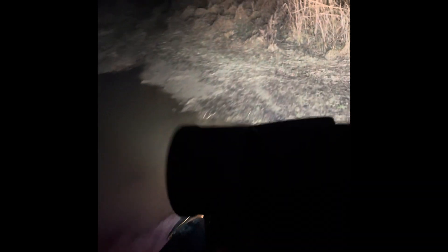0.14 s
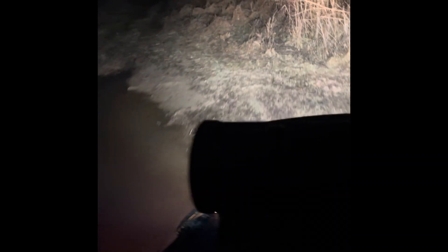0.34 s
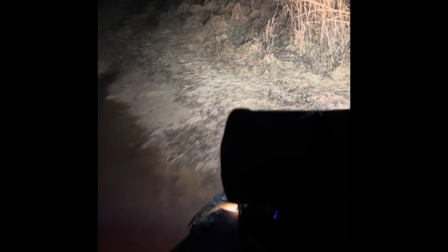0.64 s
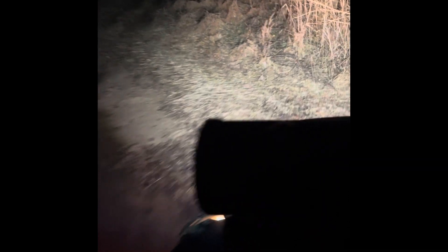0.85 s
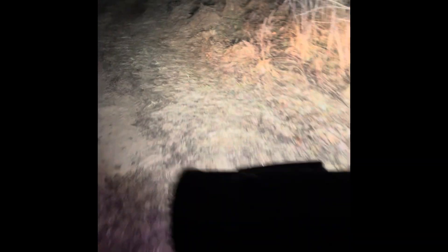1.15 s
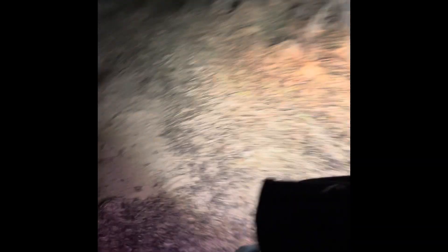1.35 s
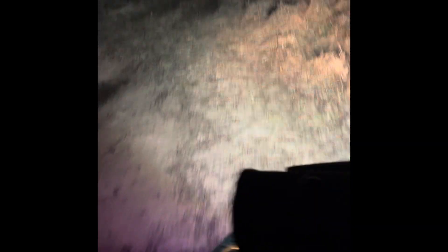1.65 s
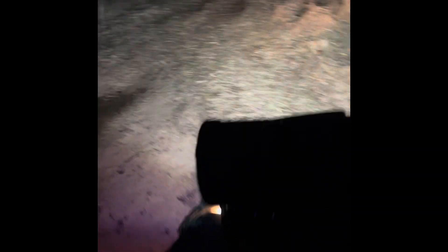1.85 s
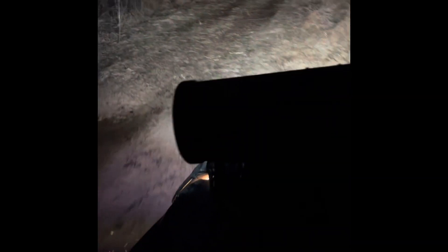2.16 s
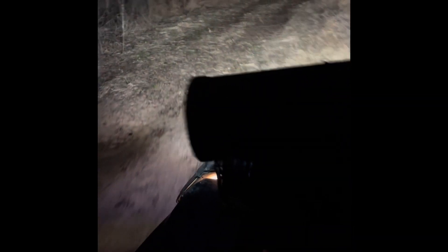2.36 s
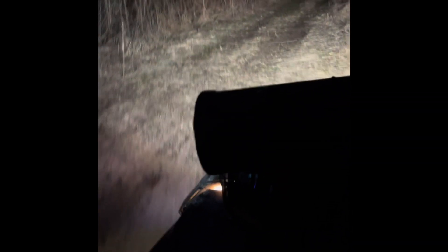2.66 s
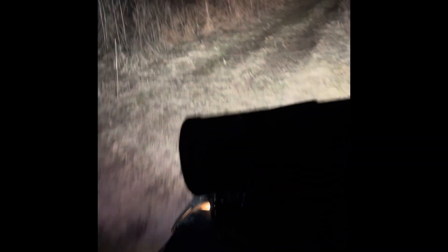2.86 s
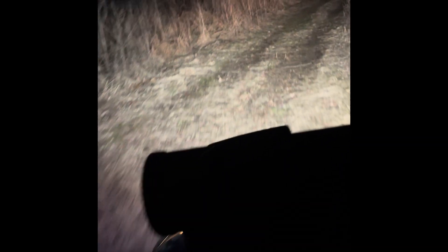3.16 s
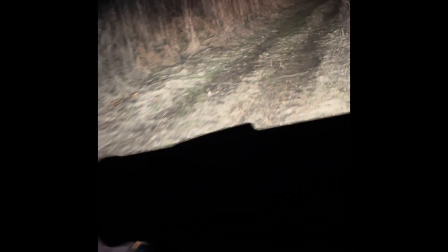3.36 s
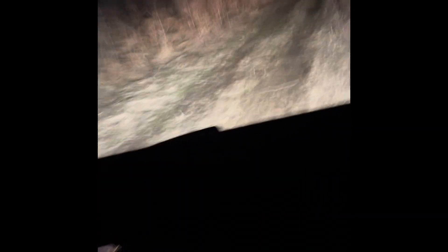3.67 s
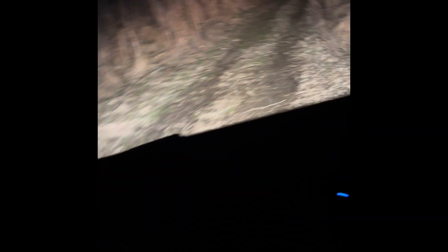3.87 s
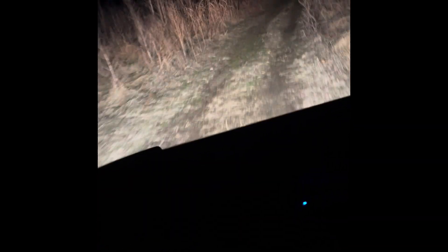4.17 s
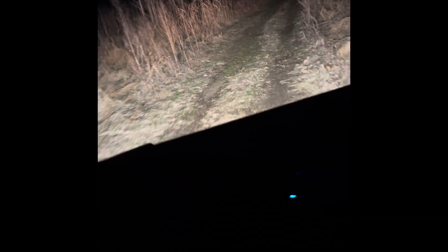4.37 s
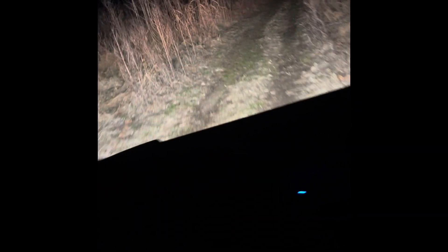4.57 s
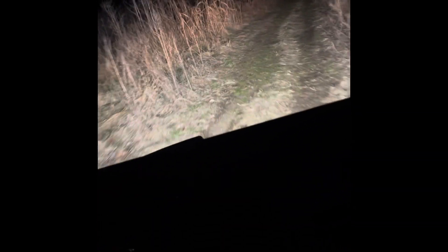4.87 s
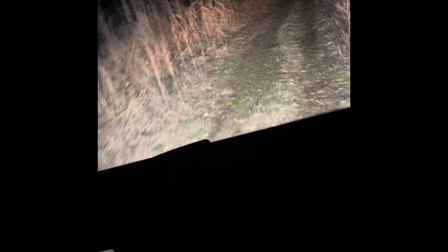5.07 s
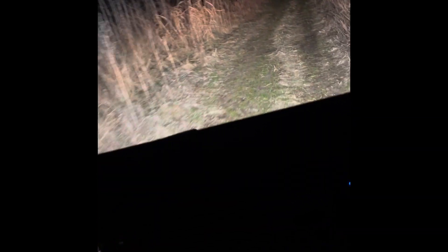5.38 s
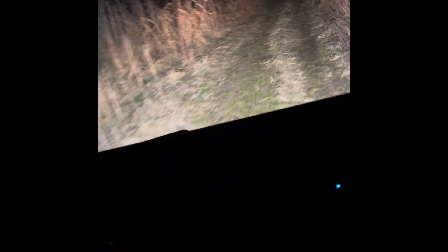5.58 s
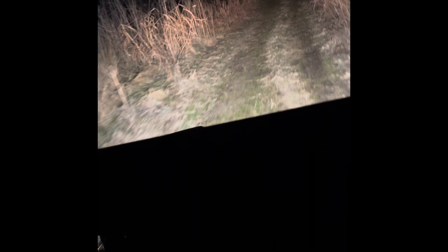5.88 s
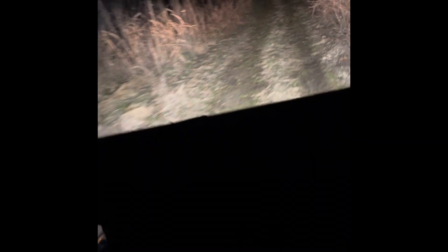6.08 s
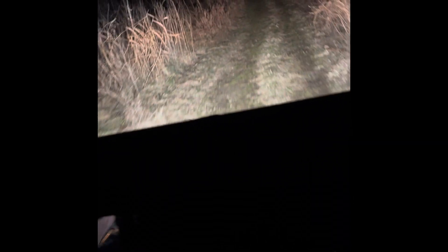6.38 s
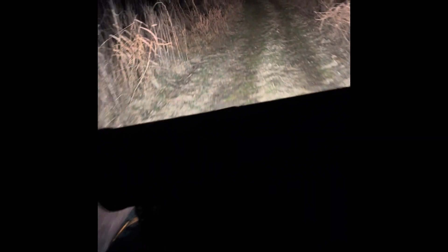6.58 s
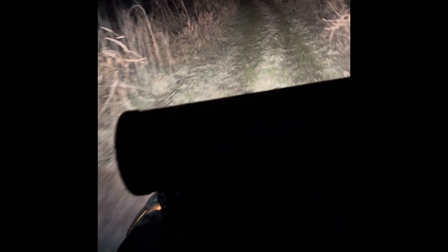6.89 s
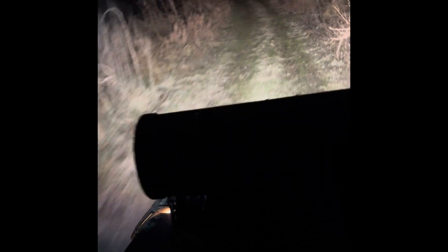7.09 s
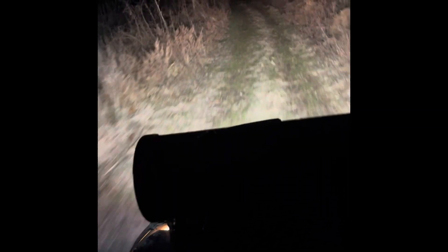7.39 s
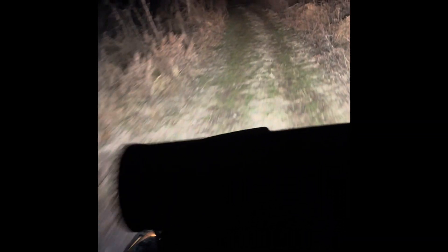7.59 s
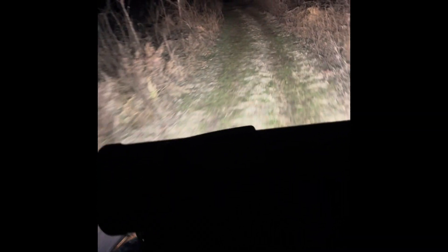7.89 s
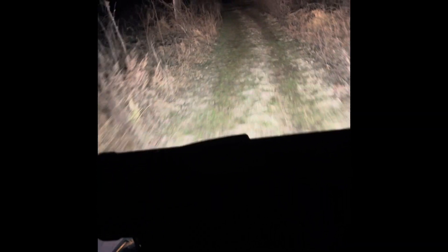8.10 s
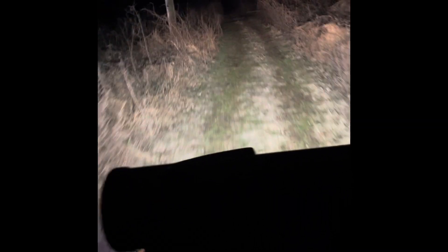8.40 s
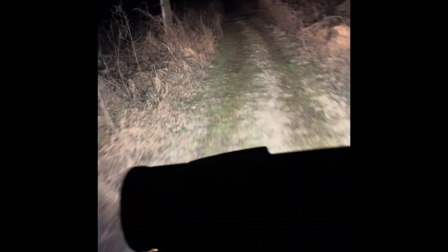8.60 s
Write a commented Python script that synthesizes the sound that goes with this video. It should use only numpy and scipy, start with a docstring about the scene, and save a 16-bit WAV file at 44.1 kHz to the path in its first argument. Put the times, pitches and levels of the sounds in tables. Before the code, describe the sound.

Low throbbing quad bike engine sags, surges and climbs to a steady drone, with a creaking frog at the start and bright spatter mid-way.

```python
"""On a muddy track at night, a two-cylinder quad bike grinds along, heard from the saddle.
Exhaust pulses ring in the pipe, and crankcase knocks, panels and teeth add higher tones tied to the engine.
Filtered noise makes gas and spray hiss in step with the firings; gliding tones are gears that whine now and then.
Short bursts of noise are the taps of a loose part, short pings are spray droplets on the bodywork,
and a frog, built from clicks of a ringing throat, creaks beside the track at the start."""
import sys
import numpy as np
from scipy import signal
from scipy.fft import rfft, irfft
from scipy.io import wavfile
from scipy.ndimage import uniform_filter1d

SR = 44100
rng = np.random.default_rng(int(sys.argv[2]) if len(sys.argv) > 2 else 0)


def store_wav(level_fs):
    """Save 16-bit WAV to argv[1]."""
    pcm = np.round(np.clip(np.atleast_2d(level_fs), -1, 1) * 32767)
    wavfile.write(sys.argv[1], SR, pcm.T.astype(np.int16))


N = 385434

# An engine "order" is a tone at a whole number of times the engine-cycle rate.
# Speeds at which the engine's tone is described. Each entry: engine cycles per second.
ENGINE_SPEEDS = [24.5, 28.5, 32, 36]
# Uneven firing of the two cylinders. Each row: order, then its level in dB at each of the four speeds.
FIRING_ORDERS = [(1, -37, -17, -24, -13), (2, 11.5, 12.5, 10, 7.5), (3, -8, -8, -5, -5.5),
                 (4, -4, 3.5, 3, 5), (5, 9, 10, 10, 2), (6, -4, 7, 1.5, -1.5), (7, -3, -6.5, -13, -9),
                 (8, -4.5, -4.5, 7, 5.5), (9, -6.5, -0.5, 5.5, 6), (10, -3, 10.5, -20, 5.5),
                 (11, 11, 8.5, 4, 7.5), (12, 8.5, -2.5, 5, 5.5), (13, 3, 0, -7.5, 9), (14, 2, -21, 5, -13),
                 (15, 4, -0.5, -25, -4), (16, -39, 7, 3.5, 6)]


def from_db(db):
    """Turn decibels into a gain."""
    return 10 ** (np.asarray(db) / 20)


def in_time(rows):
    """Join the points of a time table by straight lines: one value a sample for each column."""
    seconds, *columns = np.transpose(rows)
    return [np.interp(np.arange(N) / SR, seconds, column) for column in columns]


def at_hz(points, hz):
    """Read a spectrum table at any pitch, with pitch on a log scale."""
    table_hz, values = np.array(points).T
    return np.interp(np.log(np.maximum(hz, 1)), np.log(table_hz), values)


def coloured(x, points):
    """Filter to the given dB at each pitch, answering as early as possible (minimum phase)."""
    size = 2 ** 14
    gain = from_db(at_hz(points, np.arange(size // 2 + 1) * SR / size))
    # folding the cepstrum forward in time gives the minimum-phase filter
    cepstrum = irfft(np.log(gain))
    cepstrum[1:size // 2] *= 2
    cepstrum[size // 2 + 1:] = 0
    ringing = irfft(np.exp(rfft(cepstrum)))
    return signal.fftconvolve(x, ringing)[:N]


def drift(rate):
    """Wander slowly by chance around 0: "rate" random points a second, joined smoothly."""
    points = rng.standard_normal(int(N / SR * 200) + 4)
    # worked out at every 32nd sample, then filled in
    at = np.arange(N // 32 + 2) * 32 / SR * rate
    left = at.astype(int)
    blend = .5 - .5 * np.cos(np.pi * (at % 1))
    slow = points[left] * (1 - blend) + points[left + 1] * blend
    return np.interp(np.arange(N) / 32, np.arange(len(slow)), slow)


def struck(events, seconds, pulse):
    """Lay short pulses at their times; each row starts with time and dB, pulse(t, row) gives the shape."""
    out, t = np.zeros(N), np.arange(int(seconds * SR)) / SR
    for row in events:
        at = round(row[0] * SR)
        out[at:at + len(t)] += from_db(row[1]) * pulse(t, row)
    return out


def exhaust(per_s, cycle, throttle_db, labour_db, uneven_db):
    """One pulse pattern a cycle, built from orders, uneven from burn to burn and rung through the pipe."""
    # Exhaust pipe and body. Each row: pitch in Hz, height in dB of an engine order at that pitch.
    pipe = [(25, -32.5), (50, -28.5), (70, -15.5), (90, -11.5), (120, -15.5), (160, -31.5), (195, -11.5),
            (225, 1), (260, -21), (290, -28), (340, -22), (410, -32), (560, -38.5), (900, -61.5)]
    # Lag of the high orders at each of the four speeds, in radians per order squared.
    smear_table = [-0.0137, 0.0506, 0.0635, 0.0591]
    # The pulse turns from suck to push with speed. Each entry: half turns at one of the four speeds.
    skew_table = [0.43, -0.72, -1.436, -1.73]
    # Orders that swell when the engine labours. Each entry: order.
    thump_orders = (1, 3)
    # One weak burn: time in seconds, length in seconds, level change in dB.
    weak_burn = (1.035, .015, -6)
    turn = 2 * np.pi * (cycle + .002 * drift(30))
    # the orders leave the pipe at slightly different moments
    smear = np.interp(per_s, ENGINE_SPEEDS, smear_table)
    skew = np.pi * np.interp(per_s, ENGINE_SPEEDS, skew_table)
    pulses = np.zeros(N)
    for k, *dbs in FIRING_ORDERS:
        level_db = np.interp(per_s, ENGINE_SPEEDS, dbs) + labour_db * (k in thump_orders)
        pulses += from_db(level_db) * np.cos(k * turn - smear * k * k + skew)
    weak_at, weak_s, weak_change_db = weak_burn
    weak_db = weak_change_db * np.exp(-((np.arange(N) / SR - weak_at) / weak_s) ** 2)
    pulses *= from_db(throttle_db + weak_db + uneven_db * drift(45))
    return -coloured(pulses, pipe)


def crankcase(per_s, cycle, roar_db, swell_db):
    """Knocks repeat every cycle: high orders in scattered phase swell and fade, with panels and teeth."""
    # Crankcase ringing at the high orders. Each row: pitch in Hz, level in dB over the roar level.
    case = [(500, -19.5), (620, -17), (760, -14), (950, -21), (1150, -27), (1280, -22.5), (1480, -23.5),
            (1670, -24), (1850, -34), (2000, -23), (2150, -44.5), (2280, -32), (2550, -28.5), (2800, -34.5)]
    # Panels that sing when an engine order meets them. Each row: pitch in Hz, width in Hz,
    # level in dB over the roar level at the highest of the four speeds.
    panels = [(560, 40, -17), (735, 40, -11), (815, 70, -10), (2280, 60, -24)]
    # Orders that stand out at every speed, likely meshing teeth. Each row: order, dB over the roar level.
    mesh = [(16, -20), (23, -17), (36, -22)]
    top_order = 82   # the orders stop just below this
    panel_db_per_cycle = 1.7   # the panels sing more as the speed rises
    swelling, steady = np.zeros(N), np.zeros(N)
    turn = 2 * np.pi * (cycle + .002 * drift(12))
    for k in range(len(FIRING_ORDERS) + 1, top_order):
        order = np.cos(k * turn + rng.uniform(0, 2 * np.pi))
        steady += order
        # even orders lead, as both cylinders add up
        swelling += from_db(-3.0 * (k % 2) + swell_db * drift(4.0)) * order
    out = coloured(swelling * from_db(roar_db), case)
    for hz, width_hz, level_db in panels:
        edges_hz = [hz - width_hz / 2, hz + width_hz / 2]
        band = signal.butter(2, edges_hz, "band", fs=SR, output="sos")
        speed_db = panel_db_per_cycle * (per_s - max(ENGINE_SPEEDS))
        panel_db = roar_db + level_db + speed_db + 2.0 * drift(15)
        out += from_db(panel_db) * signal.sosfilt(band, steady)
    for k, level_db in mesh:
        out += from_db(roar_db + level_db + 3.1 * drift(7.1)) * np.cos(k * turn)
    return out


def roar(cycle, roar_db, hiss_db, flicker_db):
    """Gas and spray noise swings with each puff; noise shared by the ears mixes with noise opposite in them."""
    # Noise common to both ears. Each row: pitch in Hz, relative level in dB per Hz.
    mid_colour = [(25, -6.5), (120, 1), (230, -6.5), (330, -0.5), (430, -6.5), (541, -8), (780, -5.5),
                  (1180, -17), (1960, -17), (3300, -25), (4800, -32), (5700, -23), (8110, -30), (9100, -92),
                  (9700, -33), (11200, -25), (13300, -36.5)]
    # Noise opposite in the two ears. Each row: pitch in Hz, relative level in dB per Hz.
    side_colour = [(100, -32), (400, -15.5), (750, -13), (1200, -28.5), (1750, -46), (2500, -23.5),
                   (4000, -27.5), (5000, -25.5), (6100, -40.5), (7200, -27), (9000, -24), (11000, -25),
                   (12000, -46), (13300, -71)]
    # Share of the opposite noise that is the common noise reaching one ear first.
    # Each row: pitch in Hz, share (over 0 means left first).
    one_sided = [(700, -.5), (3300, -.5), (4000, .6), (8800, .85), (9600, -.8)]
    # Gas puffs within an engine cycle. Each row: place in the cycle from 0 to 1, sharpness,
    # lift of the roar in dB, lift of the hiss in dB.
    puffs = [(0.401, 13, -1.5, 3.5), (.72, 0.63, 2, -1)]
    split_hz = 2720   # roar below, hiss above
    rasp_db, hiss_flicker_db = 1.0, 1.03   # burn-to-burn unevenness of the roar; flicker of the treble
    hz = np.arange(N // 2 + 1) * SR / N
    share = at_hz(one_sided, hz)
    common, own = rfft(rng.standard_normal((2, 2, N)))
    # the quarter-turn 1j makes the shared part arrive earlier in one ear
    opposite = 1j * share * common + np.sqrt(1 - share ** 2) * own
    mid_spectrum = common * from_db(at_hz(mid_colour, hz))
    side_spectrum = opposite * from_db(at_hz(side_colour, hz))
    # two separate noises, each holding a mid (common) and a side (opposite) signal
    dull, bright = irfft(np.stack([mid_spectrum, side_spectrum], axis=1), N)
    low = signal.sosfilt(signal.butter(2, split_hz, "low", fs=SR, output="sos"), dull)
    high = signal.sosfilt(signal.butter(2, split_hz, "high", fs=SR, output="sos"), bright)
    low_db = roar_db + flicker_db * drift(12) + rasp_db * drift(70)
    high_db = hiss_db + hiss_flicker_db * drift(60)
    for place, sharpness, roar_lift_db, hiss_lift_db in puffs:
        puff = np.exp(sharpness * (np.cos(2 * np.pi * (cycle - place)) - 1))
        low_db = low_db + roar_lift_db * puff
        high_db = high_db + hiss_lift_db * puff
    mid, side = low / low[0].std() * from_db(low_db) + high / high[0].std() * from_db(high_db)
    return np.array([mid + side, mid - side])


def gears(cycle, wander_db):
    """Meshing teeth sing as wavering tones that glide, throb once a cycle and fade in and out."""
    # Gear whines. Each row: start in seconds, end in seconds, first pitch in Hz, last pitch in Hz,
    # level in dB (averaged over the wave, before throb and wander).
    whines = [(.82, 1.198, 1350, 1320, -44), (3, 3.943, 2140, 2300, -52), (3.084, 3.692, 1090, 1091, -36),
              (3.003, 4.892, 1675, 1708, -44), (3.806, 4.7, 1385, 1370, -57), (3.803, 5, 1056, 1058, -42.5),
              (3.901, 6.1, 890, 905, -52.5), (4, 6.2, 985, 987, -48.5), (5, 6.318, 1242, 1315, -39),
              (5.298, 6.22, 1896, 1896, -44.5), (6.18, 6.554, 1900, 2000, -50),
              (6.252, 6.655, 1303, 1510, -38), (6.258, 6.517, 1012, 1190, -39),
              (6.456, 8, 2020, 1945, -41.5), (6.501, 7.25, 958, 943, -37.5), (6.656, 7.6, 1644, 1625, -43),
              (6.907, 7.8, 2270, 2350, -48), (7.45, 8.902, 800, 826, -38.5), (7.852, 8.5, 1075, 1085, -41)]
    fade_s, throb_depth = 0.085, 0.49   # depth from 0 to 1
    out, t = np.zeros(N), np.arange(N) / SR
    for start, end, first_hz, last_hz, level_db in whines:
        on = (t > start) & (t < end)
        hz = np.interp(t[on], [start, end], [first_hz, last_hz]) * (1 + 0.00394 * drift(30)[on])
        fade = np.clip(np.minimum(t[on] - start, end - t[on]) / fade_s, 0, 1)
        throb = 1 + throb_depth * np.cos(2 * np.pi * (cycle[on] + rng.random()))
        gain = np.sqrt(2) * from_db(level_db + wander_db * drift(15)[on])
        out[on] += gain * fade * throb * np.sin(2 * np.pi * np.cumsum(hz) / SR)
    return out


def ticks(cycle, decay_s, spread_db):
    """A loose part taps once a cycle: noise snaps of a few milliseconds, uneven in strength, made bright."""
    # Strength of the taps: faint at first, strongest from about 2.3 to 3 seconds, then slowly weaker.
    # Each row: time in seconds, level in dB before the brightening.
    tap_levels = [(0, -52), (2.0, -46), (2.3, -41), (3.0, -42), (4.5, -45), (8.74, -50)]
    # The hardest taps. Each row: time in seconds, level in dB before the brightening.
    hard_taps = [(2.1999, -32), (2.2388, -39), (2.2802, -33), (2.3206, -31), (2.36, -27), (2.4014, -29),
                 (2.4354, -30), (2.5082, -31), (2.6494, -31), (2.7501, -27), (2.9218, -30), (3.3039, -31)]
    beat_s = 2.4011   # one of the taps; the others are whole cycles away
    beats = np.arange(cycle[round(beat_s * SR)] % 1, cycle[-SR // 20])
    at = np.searchsorted(cycle, beats)
    level_db = in_time(tap_levels)[0][at] + spread_db * rng.standard_normal(len(at))
    taps = [*np.column_stack([at / SR, level_db]), *hard_taps]
    snaps = struck(taps, .03, lambda t, row: rng.standard_normal(len(t)) * np.exp(-t / decay_s))
    # each pair: pitch in Hz, level in dB
    return coloured(snaps, [(3000, -30), (5800, 2), (8800, -10), (11000, 6), (13500, -12)])


def ping(t, rise_s, hz):
    """A tone that swells to its full height in rise_s and then dies away."""
    return t / rise_s * np.exp(1 - t / rise_s) * np.sin(2 * np.pi * hz * t)


def droplets(lowest_db, rise_s):
    """Fine spray pings on the bodywork at chance moments and scattered high pitches."""
    # How thick the spray is. Each row: time in seconds, droplets per second.
    spray = [(0, 12), (2.0, 44), (2.4, 104), (3.0, 120), (4.6, 35), (8.74, 18)]
    born = np.flatnonzero(rng.random(N) < in_time(spray)[0] / SR)
    born = born[born < N - SR // 50]
    chance_level, chance_pitch = rng.random((len(born), 2)).T
    level_db = lowest_db + 10.0 * chance_level
    hz = 5200 * 2.9 ** chance_pitch
    return struck(np.column_stack([born / SR, level_db, hz]), .012, lambda t, row: ping(t, rise_s, row[2]))


def frog(rise_s):
    """Each click is a throat mode that swells and dies within milliseconds."""
    # Croaks, click by click. Each row: time in seconds, peak level in dB, pitch in Hz.
    croaks = [(.0034, -24, 3250), (.0194, -31, 3330), (.0393, -32, 2980), (.0777, -22, 3180),
              (.085, -22, 3170), (.097, -27, 2930), (.112, -32, 2940), (.155, -28, 2930), (.169, -21, 3340),
              (.1745, -20, 3140), (.2534, -25, 3150), (0.261, -19.5, 3280), (.319, -24, 3170),
              (.3314, -26, 3120), (.339, -20, 3230), (.349, -28, 3300), (.3644, -30, 3350)]
    # Single lower clacks, slowing down. Each row: time in seconds, peak level in dB, pitch in Hz.
    clacks = [(.5407, -30, 2750), (.601, -25, 2900), (.6644, -27, 2950), (.7322, -30, 2850),
              (.8011, -26, 3020), (.8764, -23, 3030), (.96, -25, 2900), (1.0455, -23, 3050),
              (1.1346, -21, 3030), (1.2186, -30, 2960)]
    clack_rise_s = .0014
    clicks = [(*row, rise_s) for row in croaks] + [(*row, clack_rise_s) for row in clacks]
    return struck(clicks, .02, lambda t, row: ping(t, row[3], row[2]))


def leaning(x):
    """The machine sits a little to the left, so the ears get opposite tilts of its tone."""
    # Balance between the ears. Each row: pitch in Hz, dB up on the left and down on the right.
    balance = [(50, .1), (100, .4), (200, .9), (400, 1.1), (700, .9), (1200, .1), (3000, -.2), (8000, 0)]
    return np.array([coloured(x[0], balance), coloured(x[1], [(hz, -db) for hz, db in balance])])


def later(x, samples):
    """Delay a sound, even by part of a sample, by turning the phase of its spectrum."""
    return irfft(rfft(x) * np.exp(-2j * np.pi * samples * np.arange(N // 2 + 1) / N), N)


def scene():
    """Speed and throttle drive the engine; frog, taps and spray reach the right ear a little later."""
    # Engine speed before wander. Each row: time in seconds, engine cycles per second.
    speed_table = [(0, 27.7), (.29, 26.5), (.66, 25), (1.09, 24.2), (1.7, 29.2), (2.14, 26.3), (2.33, 25),
                   (2.51, 27.8), (2.68, 29.3), (2.85, 29.5), (3.2, 32), (3.55, 31.4), (3.8, 32.1),
                   (5.06, 31.9), (6.11, 32.3), (6.23, 31.9), (6.45, 35.6), (6.57, 36.9), (7.45, 36.3),
                   (7.54, 35.7), (7.96, 35.1), (8.74, 35.3)]
    # The rider's throttle. Each row: time in seconds, exhaust level in dB,
    # load in dB over what the speed alone asks.
    throttle = [(0, -6.5, 1.6), (.56, -5, 1), (.97, -6.5, 1.5), (1.31, -6.5, -0.5), (1.8, -5.5, 1.5),
                (2.29, -4.5, 0.5), (2.63, -4.5, 2), (3.07, -3.5, 0), (3.34, -3.5, 1), (6.01, -4.5, 0.5),
                (6.33, -2.5, -1), (6.47, -2, 1.5), (6.62, -4.5, 2), (8.35, -4, 0.5), (8.74, -4, 0.5)]
    hunting = .005   # share by which the speed wanders over bumps
    cruise_per_s = 32   # engine cycles per second
    roar_cruise_db, roar_db_per_cycle = -26.5, .5   # at cruise without extra load; rise per cycle per s
    hiss_cruise_db, hiss_db_per_cycle = -42, 0.63   # the same for the treble
    hiss_follows, labour_follows = 1, 4   # dB of hiss and dB of thump for each dB of load
    easy_pull = 8.5   # cycles per second that the engine gains in a second without strain
    growl_db = .45   # lift of the roar for each cycle per second gained in a second past the easy pull
    spatter_lag = 7.3   # samples by which taps and spray reach the right ear later
    plain_speed = in_time(speed_table)[0]
    per_s = plain_speed * (1 + hunting * drift(4))
    strain = np.maximum(np.gradient(plain_speed) * SR - easy_pull, 0)
    gaining = uniform_filter1d(strain, size=SR // 12)
    throttle_db, load_db = in_time(throttle)
    over_cruise = per_s - cruise_per_s
    roar_db = roar_cruise_db + roar_db_per_cycle * over_cruise + load_db + growl_db * gaining
    hiss_db = hiss_cruise_db + hiss_db_per_cycle * over_cruise + hiss_follows * load_db
    cycle = np.cumsum(per_s) / SR   # engine cycles turned so far
    engine = exhaust(per_s, cycle, throttle_db, labour_follows * load_db, uneven_db=0.52)
    engine += crankcase(per_s, cycle, roar_db, swell_db=3.0)
    machine = engine + gears(cycle, wander_db=2.0) + roar(cycle, roar_db, hiss_db, flicker_db=0.67)
    spatter = ticks(cycle, decay_s=0.0038, spread_db=4.5) + droplets(lowest_db=-51, rise_s=0.0024)
    call = frog(rise_s=0.0019)
    left = call + spatter
    right = np.roll(call, 4) + later(spatter, spatter_lag)
    return leaning(machine) + np.array([left, right])


def record(dry):
    """Round the peaks and cut the top, 50 dB down from the cutoff upward."""
    cutoff_hz = 14500
    rounded = 1.109 * np.tanh(dry / 1.27)
    return signal.sosfilt(signal.cheby2(8, 50, cutoff_hz, fs=SR, output="sos"), rounded)


dry = scene()
out = record(dry)
store_wav(out)
```